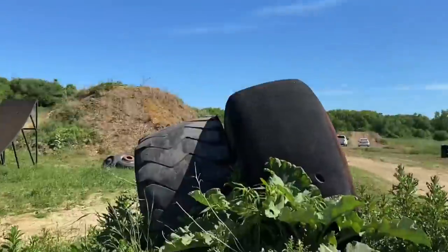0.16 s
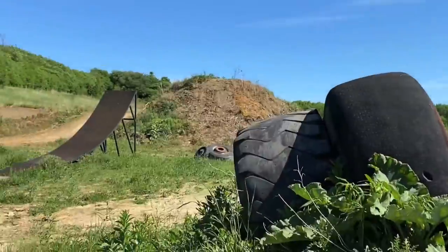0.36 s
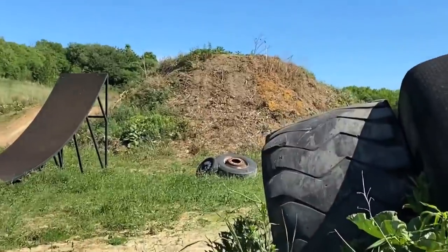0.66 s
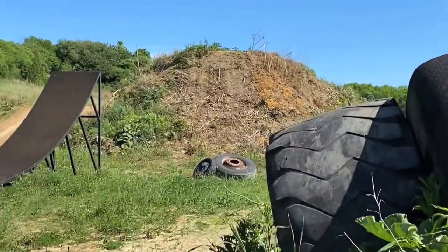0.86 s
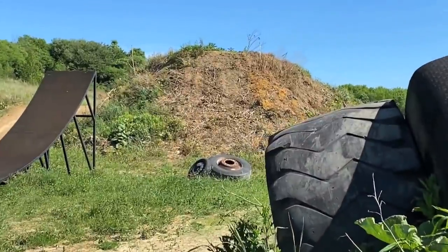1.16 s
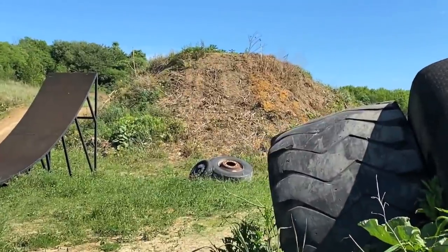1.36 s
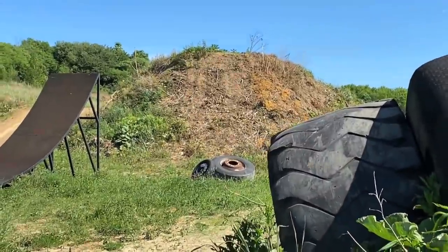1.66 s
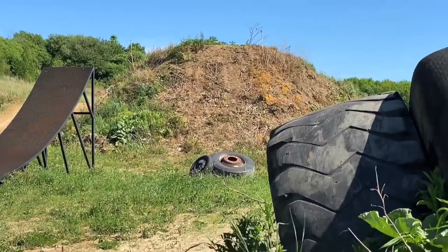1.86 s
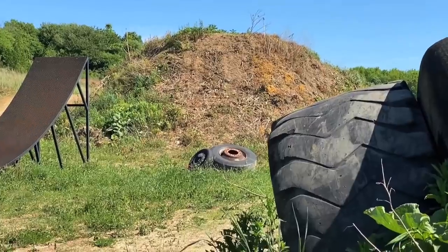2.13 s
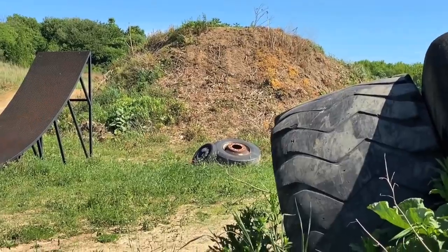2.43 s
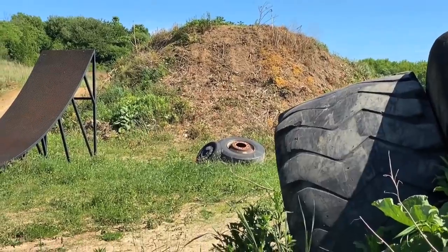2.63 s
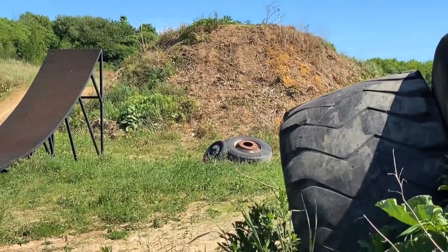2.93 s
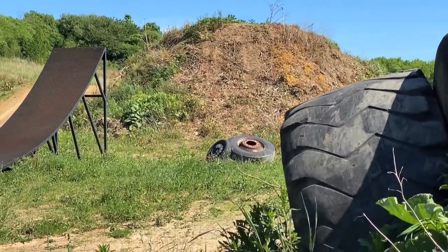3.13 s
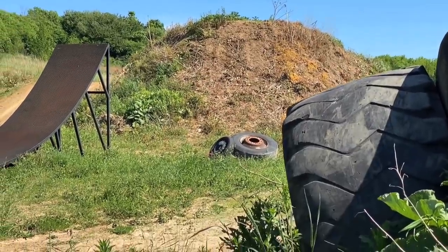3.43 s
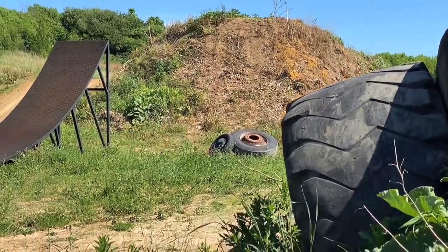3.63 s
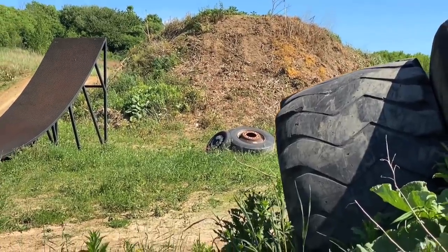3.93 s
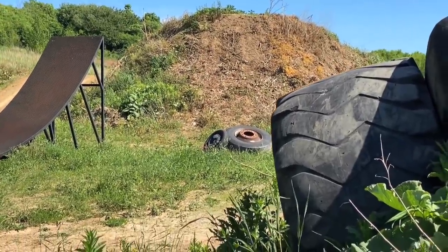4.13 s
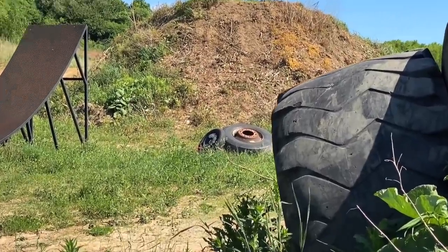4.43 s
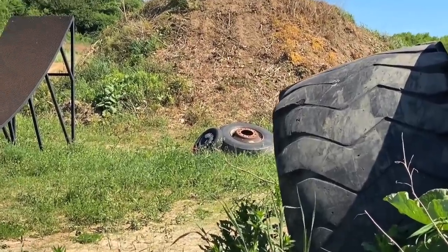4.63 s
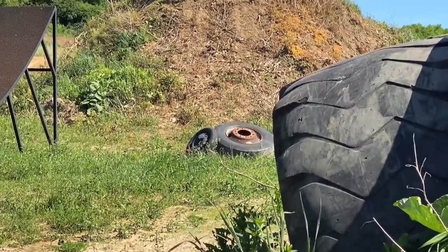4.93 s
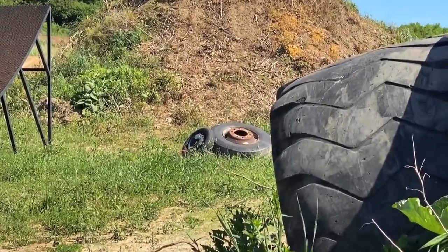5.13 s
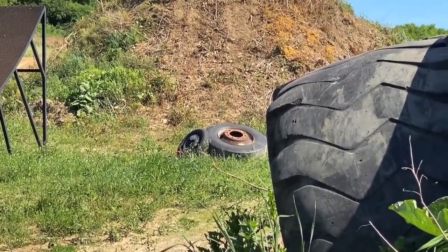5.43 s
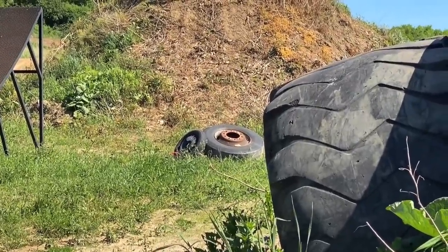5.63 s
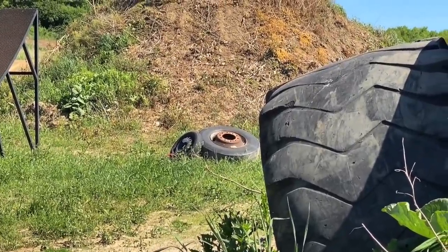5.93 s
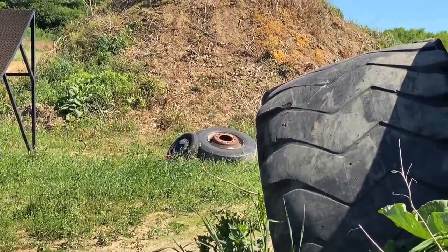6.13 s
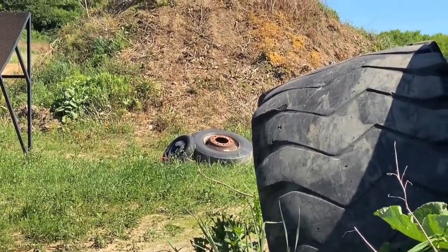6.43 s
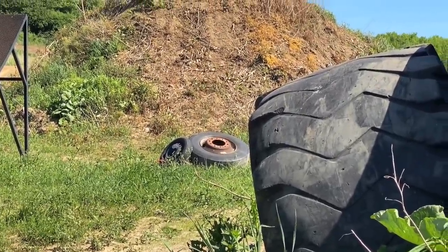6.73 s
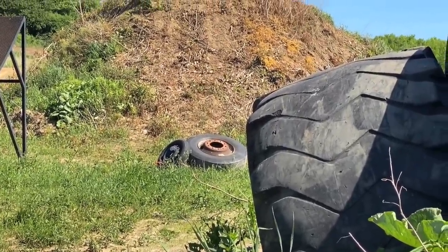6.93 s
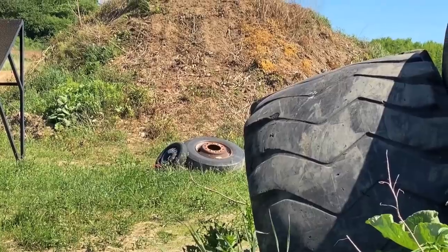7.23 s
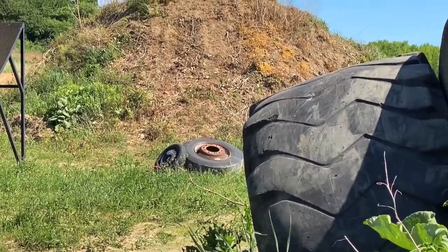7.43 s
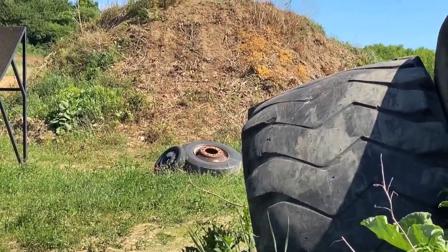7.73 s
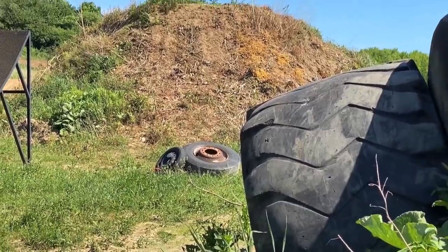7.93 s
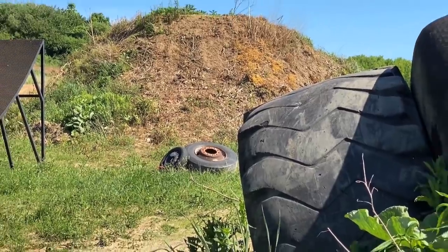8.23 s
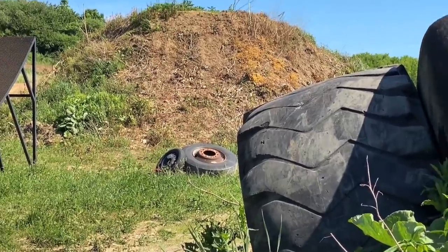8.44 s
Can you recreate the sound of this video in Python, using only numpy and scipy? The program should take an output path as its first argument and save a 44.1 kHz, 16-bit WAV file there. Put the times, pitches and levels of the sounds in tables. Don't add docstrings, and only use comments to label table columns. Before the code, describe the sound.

Outdoors in an open field, a small engine-driven compressor and an air hose at a large tire are already running. The engine putters very fast and evenly, roughly seventeen low exhaust thumps a second, each with a dry metallic valve rattle, over a mid-low drone. Compressed air hisses brightly on top: it is weaker at the very start, swells by 0.5 s, then stays continuous and fizzy, with narrow breathy whistles sagging very slightly in pitch. From about 2 s the engine's knocking sounds a little farther off. Wind buffets the bare stereo microphone, rumbling through the first 1.5 s with a sharp pop at 1.1, then gusting hard from 4.4 to 5.2 s. Fluttering flaps follow until 6 s while the bass thins, returning gradually by 7 s. Softer gusts and faint low pops come around 7 to 7.5 s. Hiss and chugging continue to the end at 8.6 s.

```python
import sys
import numpy as np
from scipy import signal
from scipy.fft import rfft, irfft, next_fast_len
from scipy.io import wavfile
from scipy.ndimage import uniform_filter1d, map_coordinates

SR = 44100
rng = np.random.default_rng(int(sys.argv[2]) if len(sys.argv) > 2 else 0)


def natural_amplitude(level_db):
    exponent = np.asarray(level_db, float) / 20
    return 10 ** exponent


def file_out(sig):
    cols = np.atleast_2d(sig).T
    lim = np.clip(cols, -1, 1)
    pcm = np.round(lim * 32767).astype(np.int16)
    wavfile.write(sys.argv[1], SR, pcm)


N = 378378

# time_s, lead_cycles
CRANK_DRIFT = [(0, 0.032), (.7, 0.042), (2, 0.015), (4.6, -0.014), (5.25, -0.0016), (5.9, 0.062),
               (6.5, 0.101), (7.3, 0.1), (8.58, 0.098)]
# delay_s, level_db
EXHAUST_PUFFS = [
    (.005, 5),
    (.018, -1),
    (.028, -5),
    (.041, -10),
    (.052, -8),
]
# pitch_hz, width_hz, level_db
MUFFLER_MODES = [(88, 67, 0), (151.3, 67, 0.5), (329.8, 6.6, -3)]
# pitch_hz, width_hz, level_db
CASING_MODES = [(889, 153, 3.5), (1200, 324, -4.5), (1812, 186, -1.5), (2250, 72, -2), (2830, 390, -5.5)]
# pitch_hz, level_db (per Hz)
DRONE_SPECTRUM = [(100, -32), (180, -0.5), (250, -6.5), (320, -1), (400, -11), (520, -16), (680, -6),
                  (900, -8), (1250, -5.5), (1520, -17), (2100, -9.5), (2550, -14.5), (3000, -13.5),
                  (4000, -33)]
# time_s, hiss_db
BREEZE_CARRY = [(0, -32), (.45, -22), (.79, -28), (1.1, -24), (1.5, -25.5), (1.7, -23.5), (2.46, -24),
                (2.94, -28), (3.4, -27.5), (3.62, -25.5), (4.3, -24.5), (4.63, -27), (6.15, -25.5),
                (6.38, -28.5), (7.15, -25.5), (7.72, -27.5), (8.05, -25.5), (8.58, -26.5)]
# pitch_hz, level_db (per Hz)
JET_SPECTRUM = [(2200, -29), (2700, -8.5), (3300, 2), (4500, 2.5), (6400, -4.5), (7600, 4.5), (8200, 0.5),
                (9500, -44)]
# pitch_hz, level_db (per Hz)
FIZZ_SPECTRUM = [(7000, -25.5), (8200, -3.5), (9100, 2.5), (10500, -2.5), (11800, 2.5), (13000, -2),
                 (14000, -3), (15000, -8), (16000, -14)]
# pitch_hz, width_hz, level_db
JET_WHISTLES = [(4516, 170, -6.5), (4857, 90, -6), (5150, 54, -10.5), (5650, 260, -6), (6126, 80, -10.5),
                (6380, 175, -9), (6870, 130, -15.5), (4160, 150, -15.5)]
# pitch_hz, width_hz, level_db
SHRILL_WHISTLES = [(9700, 270, -42), (10400, 150, -13.5), (11170, 150, -14), (12030, 270, -10)]
# time_s, lower_over_upper_db
WHISTLE_TRADE = [(0, -3), (.3, -5), (1, -5), (1.5, -4), (1.75, 8), (2.1, 6), (2.7, 5), (3.3, 1), (3.8, 5),
                 (4.6, -2), (5.3, -4.5), (5.9, 1), (6.25, 6), (6.8, -2), (7.3, 4), (8.58, -4)]
WHISTLE_SHIFT = [0.073, -0.37, -0.071, 0.29, 0.51, .05, -.15, 0.081]
# time_s, lift_db, half_length_s
TREBLE_FLARES = [(0.124, 4, 0.31), (0.37, 3.5, .08), (0.787, 4, 0.18), (1.294, 5.5, 0.16),
                 (1.636, 3, 0.074), (1.97, 4, 0.23), (2.48, 3, 0.19), (3.37, 3, 0.088), (3.917, 4, 0.074),
                 (4.382, 4.5, 0.11), (5.0, 3, 0.14), (5.4, 3.5, .08), (5.682, 2.5, 0.11), (6.153, 3.5, 0.1),
                 (6.552, 3, 0.26), (6.995, 3, 0.048), (7.183, 3, .08), (7.48, 3.5, 0.1), (8.007, 3.5, 0.12),
                 (8.5, 2.5, 0.32)]
# pitch_hz, level_db (per Hz)
BUFFET_SPECTRUM = [(20, -44), (30, -11), (55, 1.5), (95, -0.5), (150, -7), (220, -17.5), (400, -43.5)]
# pitch_hz, level_db (per Hz)
FLUTTER_SPECTRUM = [(90, -48), (170, -7.5), (260, -2), (350, -7), (500, -18), (800, -54)]
# start_s, length_s, buffet_db
WIND_GUSTS = [
    (-.2, 1.6, -42),
    (4.35, 0.73, -39),
    (6.796, 1.1, -46),
]
# time_s, buffet_db
WIND_EDDIES = [(.34, -43), (.56, -37), (.65, -41), (.76, -40), (1.06, -34), (1.16, -31), (1.24, -30),
               (1.45, -37), (2.63, -45), (3.57, -47), (3.83, -42), (4.55, -40), (4.71, -40), (4.84, -28),
               (4.99, -37), (5.1, -43), (5.2, -38), (5.55, -46), (5.78, -52), (6.07, -52), (6.2, -51),
               (6.42, -50), (7.05, -41), (7.22, -41), (7.5, -45), (7.6, -40), (7.74, -42), (8.2, -42),
               (8.39, -40)]
# time_s, lift_db, half_length_s
FLUTTER_FLAPS = [
    (1.0, 2, .05),
    (1.2, 5.5, .04),
    (1.32, 8, .05),
    (4.62, 4, .04),
    (5.06, 8, .04),
    (5.45, 7, .05),
    (5.732, 11, .04),
    (6.0, 10, .06),
]
# time_s, peak_db, pitch_hz
WIND_POPS = [
    (0.939, -16.5, 86.1),
    (1.104, -9, 145),
    (4.83, -18.5, 103),
    (5.04, -20.5, 91.3),
    (7.009, -23.5, 115.7),
    (7.479, -22, 98),
]
# pitch_hz, left_lead_rad
PORT_LEAD = [(0, .55), (450, .5), (950, 1.9), (1850, 0), (5150, .85), (5950, -.8), (6650, 0), (7860, 0),
             (8050, 2.1), (9000, 2.1), (10800, 0), (13300, -3.14), (14400, -3.88), (15450, -6.28)]
# pitch_hz, left_over_right_db
PORT_TILT = [(100, -3.5), (250, 1), (600, 3), (1000, 4.5), (1300, 0), (1500, 7.5), (1750, 0)]


def compressor():
    t = np.arange(N) / SR
    carry_db = slow_carry()
    turned_s, turn_s = 2.3, 0.43
    nearer_db = 3 / (1 + np.exp((t - turned_s) / turn_s))
    facing_db = 4 * np.exp(-t / .15)
    near_db = nearer_db - facing_db
    thump_db = -38.5 + .15 * carry_db
    knock_db = -44.5 + 0.21 * carry_db + near_db
    drone_db = -42.5 + 0.29 * carry_db + 0.3 * near_db

    cycles_per_s = 17.24
    crank = cycles_per_s * t + curves(CRANK_DRIFT)[0]
    starts = np.flatnonzero(np.diff(np.floor(crank)))
    chance = rng.standard_normal((len(starts), 8))
    thump = natural_amplitude(thump_db) * exhaust(starts, chance) * [[1], [0]]
    knock = natural_amplitude(knock_db) * valve_knock(starts, chance)
    drone = natural_amplitude(drone_db + 1.2 * wobble(3.24)) * rush(DRONE_SPECTRUM, patchy_db=0.5)
    return thump + knock + drone


def exhaust(starts, chance):
    puffs = np.zeros(N + SR)
    for k, (delay_s, level_db) in enumerate(EXHAUST_PUFFS):
        jitter = np.round(6 * chance[:, k]).astype(int)
        puffs[starts + round(delay_s * SR) + jitter] += natural_amplitude(level_db + 0.69 * chance[:, k + 1])

    def muffler(f):
        advance = np.exp(2j * np.pi * f * 0.00297)
        return -resonances(MUFFLER_MODES)(f) / (1 + (f / 450) ** 4) * advance

    return unit(filtered(puffs[:N], muffler))


def valve_knock(starts, chance):
    blows = np.zeros(N)
    jitter = np.round(30 * chance[:, 6]).astype(int)
    hits = np.clip(starts - round(.005 * SR) + jitter, 0, N - 1)
    blows[hits] = natural_amplitude(0.62 * chance[:, 7])
    t = np.arange(SR // 20) / SR
    decay = natural_amplitude(-60 * t / 0.047) + 0.59 * natural_amplitude(-60 * t / 0.095)
    rattle = (1 - np.exp(-t / 0.00044)) * decay
    grain = np.sign(rng.standard_normal((2, N)))
    return unit(filtered(signal.fftconvolve(blows, rattle)[:N] * grain, resonances(CASING_MODES)))


def valve():
    t = np.arange(N) / SR
    hiss_db, = curves(BREEZE_CARRY)
    treble_db = -7 + 0.11 * (hiss_db - hiss_db.mean()) + bumps(*np.transpose(TREBLE_FLARES))

    trade_db, = curves(WHISTLE_TRADE)
    lower_share = .5
    swells_db = np.outer(WHISTLE_SHIFT, t - t.mean())
    swells_db[0] += lower_share * trade_db
    swells_db[1] += (lower_share - 1) * trade_db
    bend_percent = .9 - .24 * t

    jet = natural_amplitude(-7.0) * rush(JET_SPECTRUM, patchy_db=0.53)
    jet = jet + whistles(JET_WHISTLES, swells_db, bend_percent, sway_db=0.5)
    fizz = rush(FIZZ_SPECTRUM, patchy_db=1.23)
    fizz = fizz + whistles(SHRILL_WHISTLES, [0] * 4, bend_percent, sway_db=1.5)
    fizz_gain = natural_amplitude(treble_db + 3.5 + 0.69 * wobble(25))
    return natural_amplitude(hiss_db - 0.76 + 0.32 * wobble(14)) * (jet + fizz_gain * fizz)


def whistles(modes, swells_db, bend_percent, sway_db):
    air, hop = 0, 16
    slow = np.arange(0, N + hop, hop)
    for (hz, width, level_db), swell_db in zip(modes, swells_db):
        lumps = rng.standard_normal((4, len(slow)))
        for spread in (width, 3 * width):
            lumps = signal.lfilter([1], [1, -np.exp(-np.pi * spread * hop / SR)], lumps)
        lumps = np.array([np.interp(np.arange(N), slow, row) for row in lumps])
        pitch_hz = hz * (1 + (bend_percent + .35 * wobble(1.5)) / 100)
        turn = 2 * np.pi * np.cumsum(pitch_hz) / SR
        tone = unit(lumps[:2] * np.cos(turn) + lumps[2:] * np.sin(turn))
        air = air + natural_amplitude(level_db + swell_db + sway_db * wobble(2.647)) * tone
    return air


def slow_carry():
    carry_db, = curves(BREEZE_CARRY)
    return uniform_filter1d(carry_db - carry_db.mean(), size=SR // 3, mode="nearest")


def ports(paths, second_db):
    pitch_hz, lead_rad = np.transpose(PORT_LEAD)
    paths = paths * natural_amplitude([[0], [second_db]])

    def half_lead(f):
        return np.exp(.5j * np.interp(f, pitch_hz, lead_rad) * np.array([[1], [-1]]))

    def half_tilt(f):
        return natural_amplitude(along(PORT_TILT, f) / 2)

    left = filtered(paths, lambda f: half_lead(f) * half_tilt(f)).sum(0)
    right = filtered(paths, lambda f: half_lead(f).conj() / half_tilt(f)).sum(0)
    return np.array([left, right])


def wind():
    buffet_db = wind_strength()
    flutter_db = -43 + 0.49 * (buffet_db - buffet_db.mean()) + bumps(*np.transpose(FLUTTER_FLAPS))
    lumps = rush(BUFFET_SPECTRUM, patchy_db=0)
    power = np.abs(uniform_filter1d(lumps[0] ** 2, size=2600))
    lumps = unit(lumps / power ** 0.17)
    buffet = natural_amplitude(buffet_db + 1.5 + 10.3 * wind_cut()) * lumps
    flutter = natural_amplitude(flutter_db - 10.5) * rush(FLUTTER_SPECTRUM, patchy_db=2.0)
    mid, side = buffet + natural_amplitude(1.2 * wobble(9.1)) * flutter
    return np.array([mid + 0.17 * side, mid - 0.71 * side]) + wind_pops()


def wind_pops():
    lead_in = SR // 40
    pops, t = np.zeros(N + SR), np.arange(-lead_in, SR // 20) / SR
    for time_s, peak_db, hz in WIND_POPS:
        push = np.exp(-((t - .009) / 0.0051) ** 2) * np.sin(2 * np.pi * hz * t)
        front = 0.24 * np.exp(-((t - .004) / 0.0035) ** 2) * np.sin(2 * np.pi * 2.38 * hz * t)
        pops[round(time_s * SR) - lead_in:][:len(t)] += natural_amplitude(peak_db + 1.5) * (push + front)
    return pops[:N]


def wind_strength():
    rise_s, calm_db = .2, -48
    gusts = sum(natural_amplitude(db) * swell(start_s, rise_s, length_s - rise_s, fall=.1)
                for start_s, length_s, db in WIND_GUSTS)
    time_s, eddy_db = np.transpose(WIND_EDDIES)
    return 20 * np.log10(natural_amplitude(calm_db) + gusts + bumps(time_s, natural_amplitude(eddy_db), half_s=0.042))


def wind_cut():
    return 0.78 * swell(start=5.29, rise=0.29, hold=0.58, fall=1.1)


def unit(x):
    return x / np.sqrt(np.mean(x ** 2) + 1e-20)


def along(points, hz):
    f, value = np.transpose(points)
    return np.interp(np.log(hz + 1), np.log(f + 1), value)


def curves(rows):
    time_s, *columns = np.transpose(rows)
    return [np.interp(np.arange(N) / SR, time_s, column) for column in columns]


def wobble(rate):
    knots = rng.standard_normal(int(N * rate / SR) + 4)
    return map_coordinates(knots, [np.arange(N) * rate / SR])


def bumps(times, sizes, half_s):
    t = np.arange(0, N + 64, 64) / SR
    bells = np.asarray(sizes) * np.exp(-((t[:, None] - times) / half_s) ** 2)
    return np.interp(np.arange(N) / SR, t, bells.sum(1))


def swell(start, rise, hold, fall):
    corners = start + np.cumsum([0, rise, hold, fall])
    return np.interp(np.arange(N) / SR, corners, [0, 1, 1, 0])


def filtered(x, response):
    m = next_fast_len(N + 8192)
    return irfft(rfft(x, m) * response(np.fft.rfftfreq(m, 1 / SR)), m)[..., :N]


def resonances(modes):
    def response(f):
        total = 0
        for k, (hz, width, level_db) in enumerate(modes):
            damping = 1j * f * width
            total = total + (-1) ** k * natural_amplitude(level_db) * damping / (hz * hz - f * f + damping)
        return total
    return response


def rush(spectrum, patchy_db):
    z = signal.stft(rng.standard_normal((2, N)), nperseg=512)[2]
    patches = uniform_filter1d(rng.standard_normal(z.shape[1:]), size=8, axis=0)
    patches = uniform_filter1d(patches, size=16, axis=1)
    pair = signal.istft(z * natural_amplitude(patchy_db * unit(patches)), nperseg=512)[1][:, :N]
    return unit(filtered(pair, lambda hz: natural_amplitude(along(spectrum, hz))))


def scene():
    return ports(compressor() + valve(), second_db=-15.0) + wind()


def band_limit(x):
    return signal.sosfilt(signal.butter(12, 17100, fs=SR, output="sos"), x)


def record(dry):
    share = wind_cut()
    thin = filtered(dry, lambda f: f ** 4 / (f ** 4 + 165 ** 4))
    mix = (1 - share) * dry + share * thin
    top_hz = 15740
    mix = filtered(mix, lambda f: (1j * f / (1j * f + 25)) ** 2 * (f < top_hz))
    return band_limit(mix)


dry = scene()
out = record(dry)
file_out(out)
```